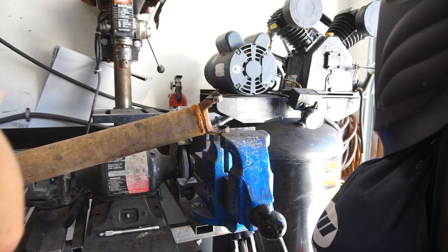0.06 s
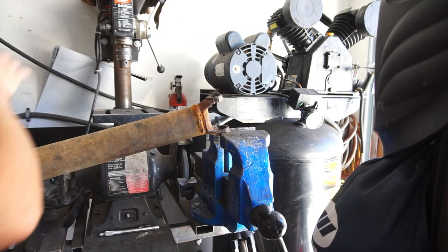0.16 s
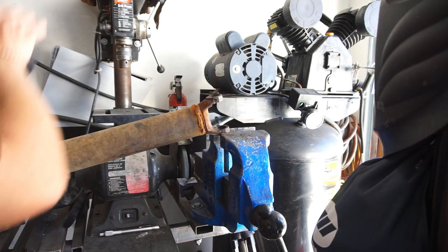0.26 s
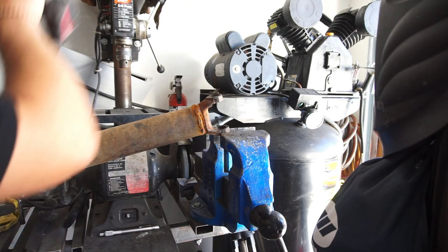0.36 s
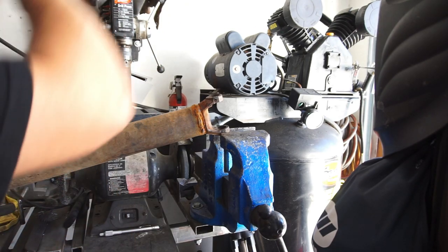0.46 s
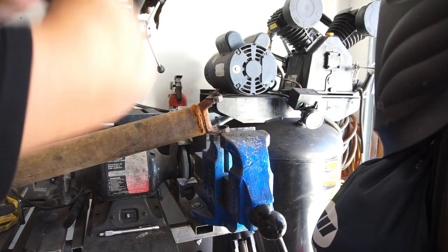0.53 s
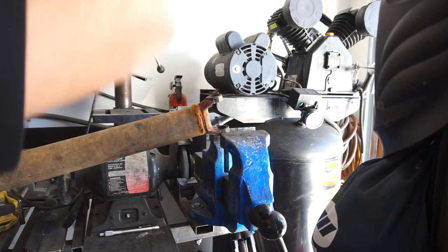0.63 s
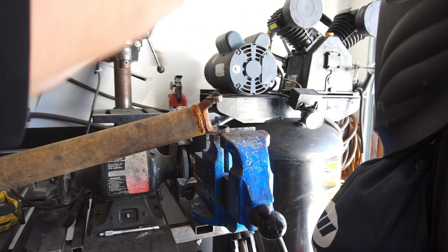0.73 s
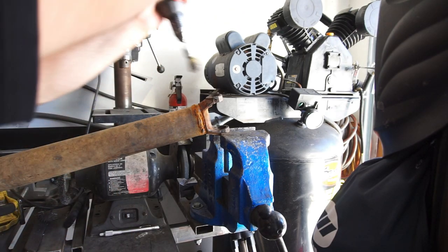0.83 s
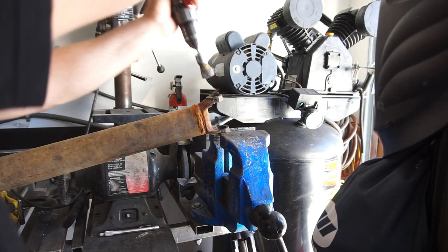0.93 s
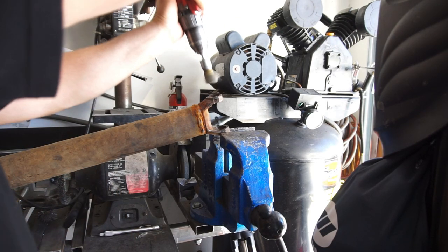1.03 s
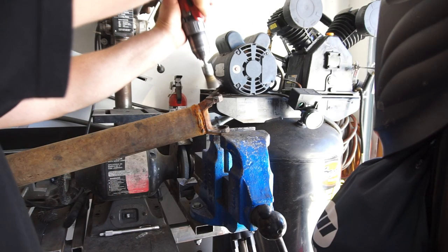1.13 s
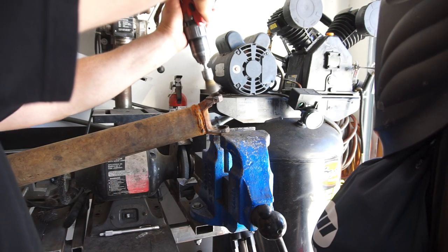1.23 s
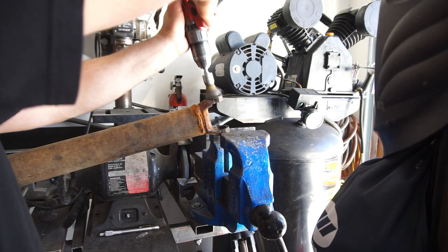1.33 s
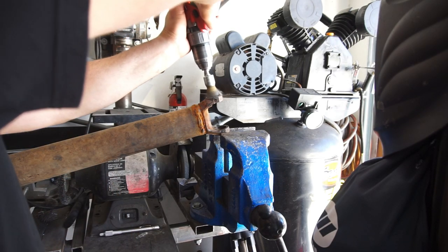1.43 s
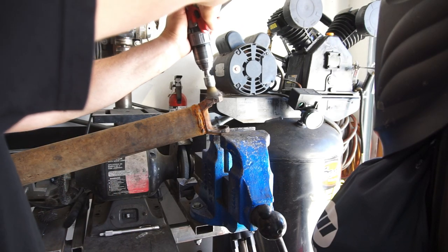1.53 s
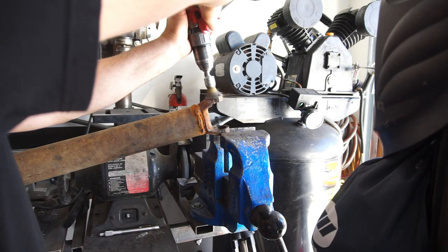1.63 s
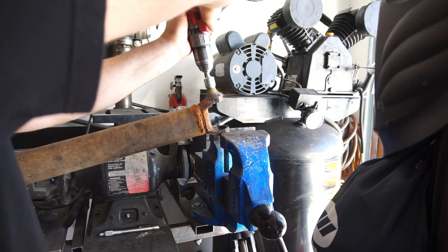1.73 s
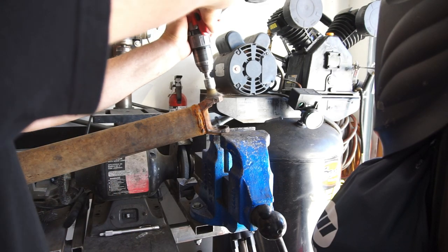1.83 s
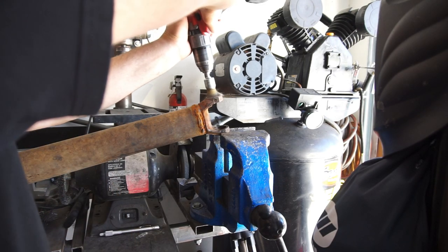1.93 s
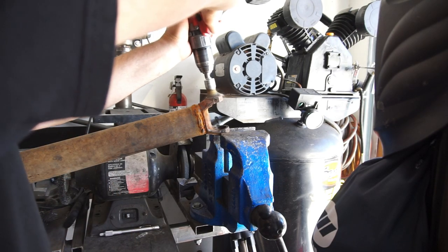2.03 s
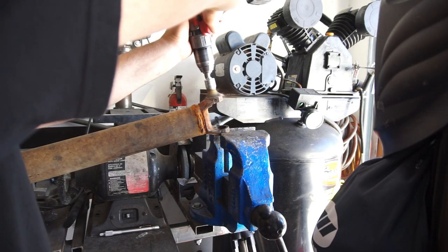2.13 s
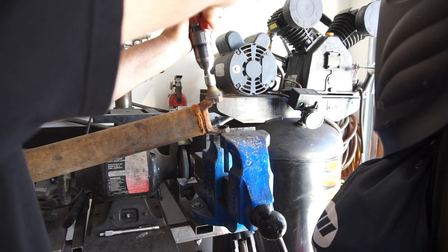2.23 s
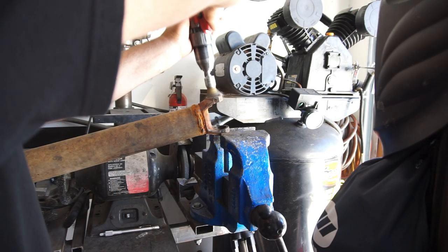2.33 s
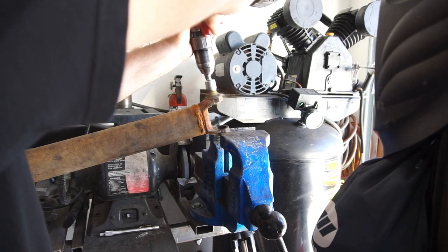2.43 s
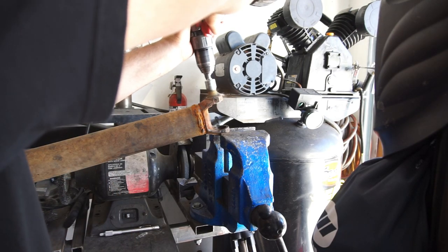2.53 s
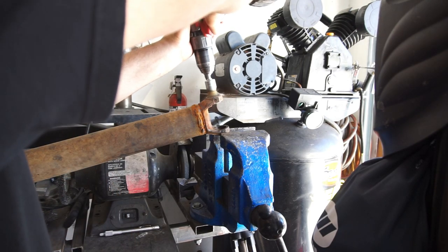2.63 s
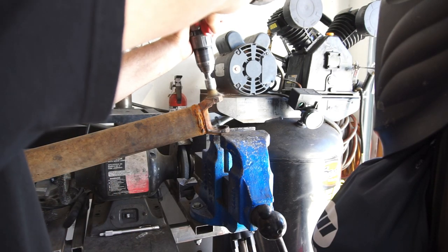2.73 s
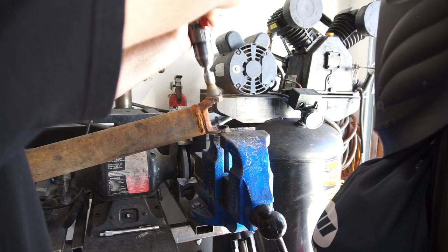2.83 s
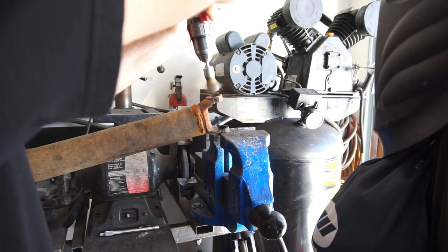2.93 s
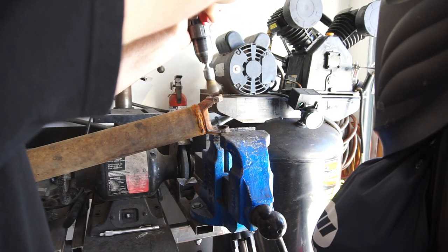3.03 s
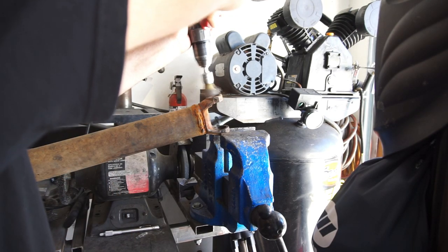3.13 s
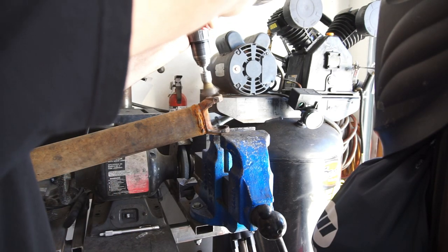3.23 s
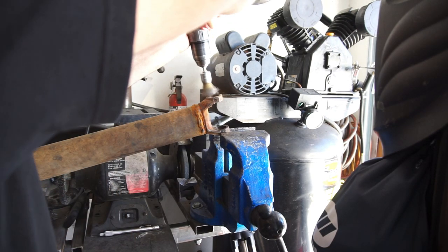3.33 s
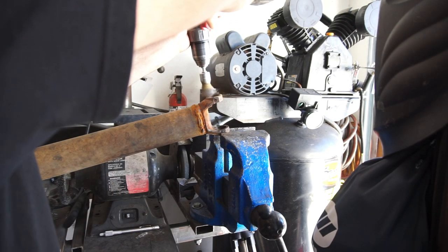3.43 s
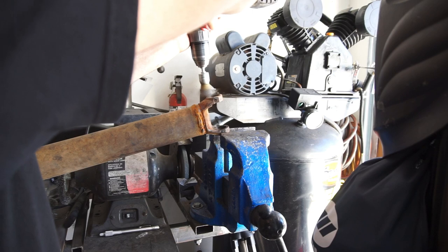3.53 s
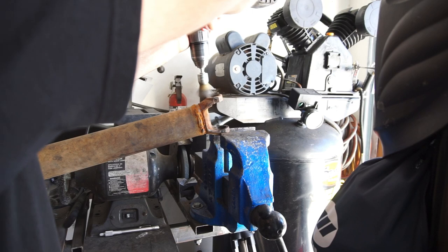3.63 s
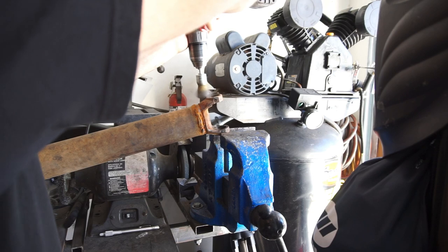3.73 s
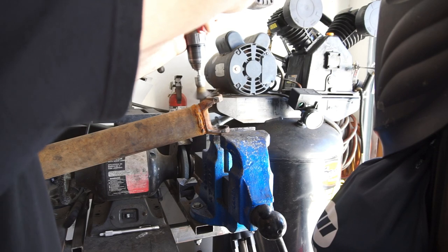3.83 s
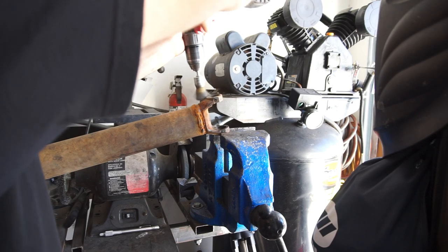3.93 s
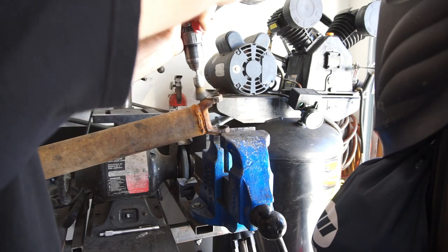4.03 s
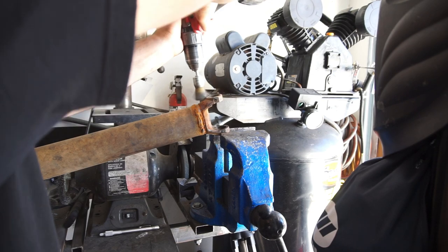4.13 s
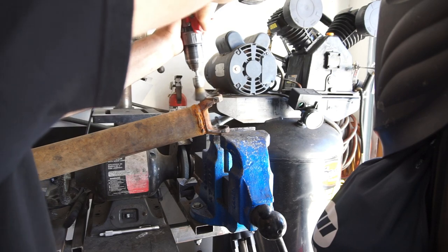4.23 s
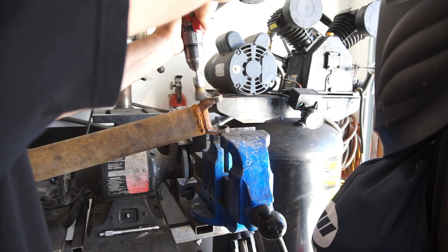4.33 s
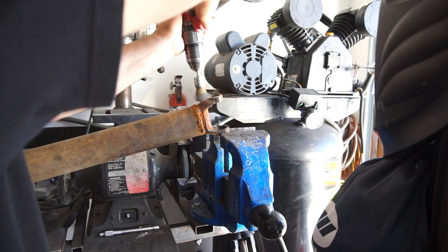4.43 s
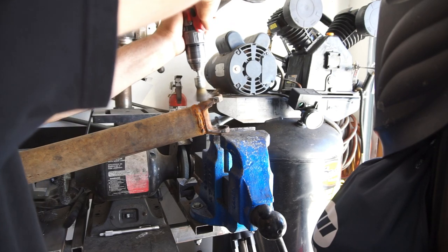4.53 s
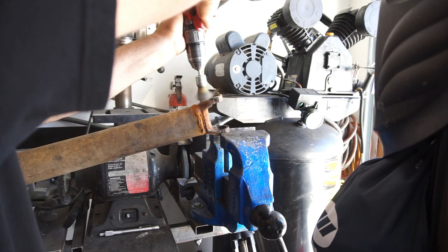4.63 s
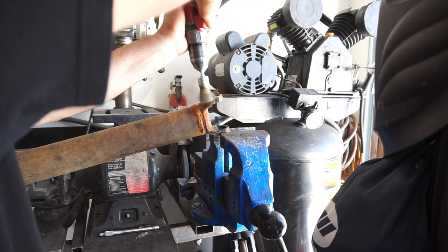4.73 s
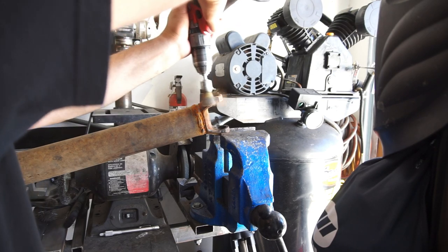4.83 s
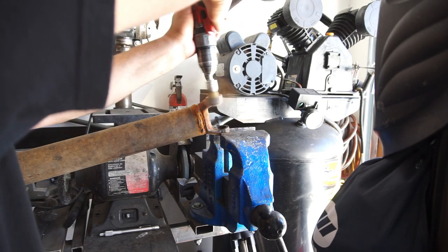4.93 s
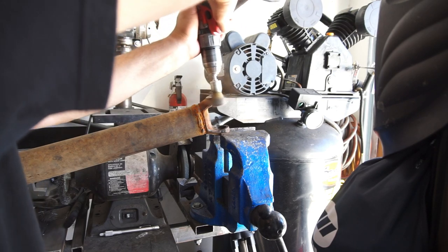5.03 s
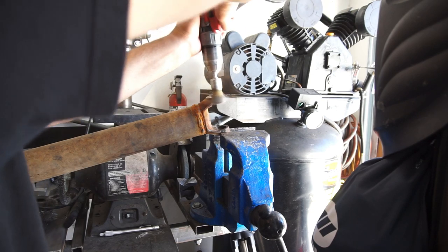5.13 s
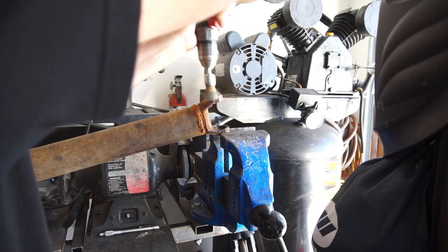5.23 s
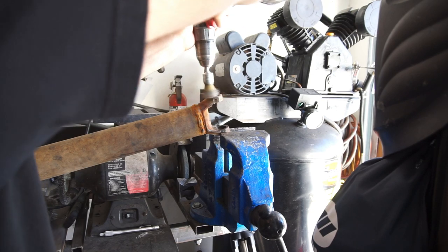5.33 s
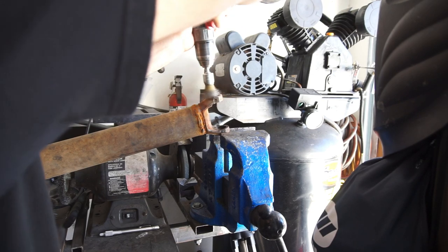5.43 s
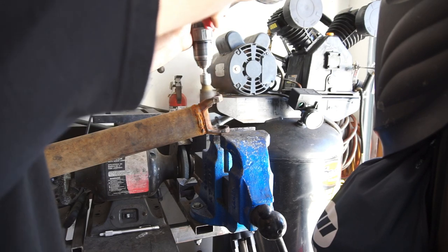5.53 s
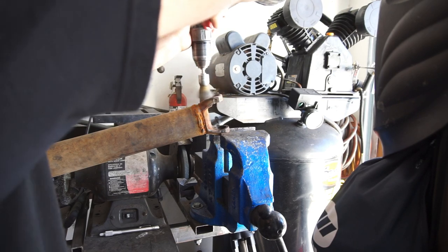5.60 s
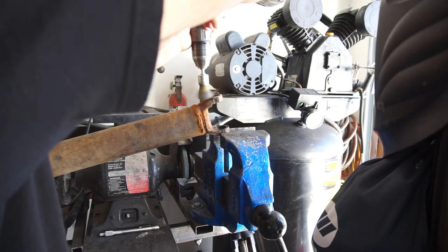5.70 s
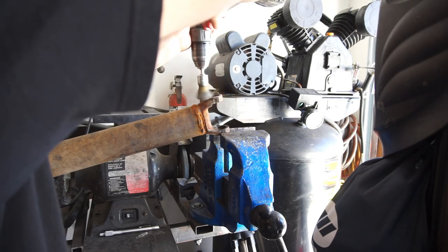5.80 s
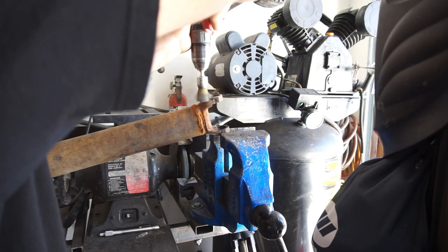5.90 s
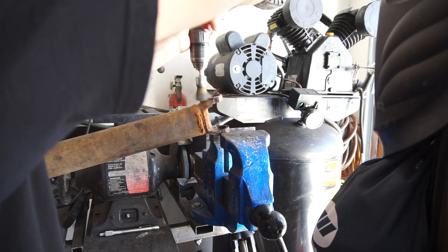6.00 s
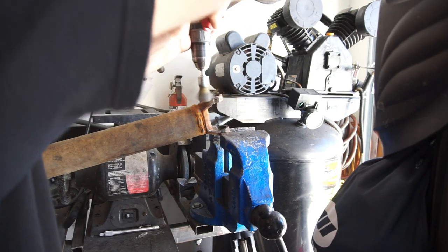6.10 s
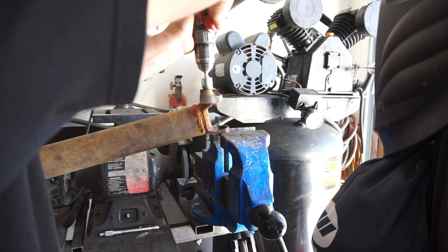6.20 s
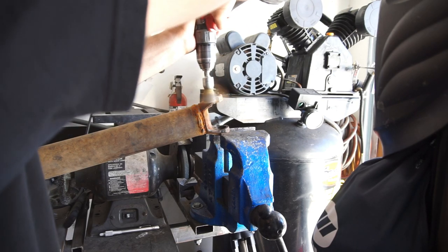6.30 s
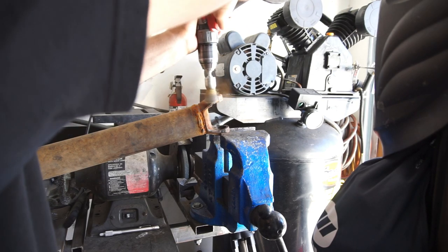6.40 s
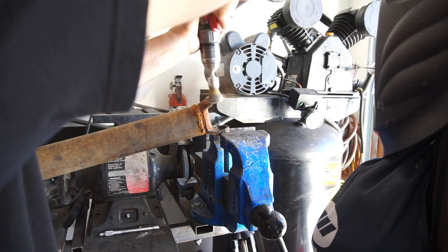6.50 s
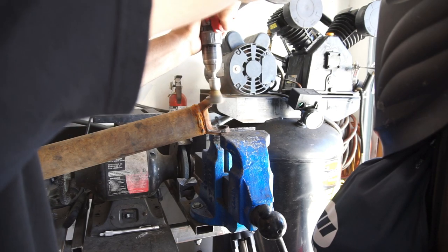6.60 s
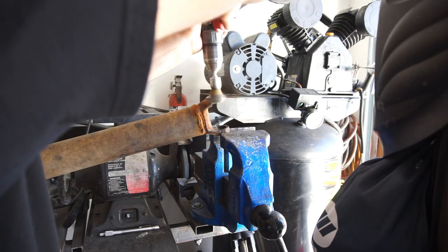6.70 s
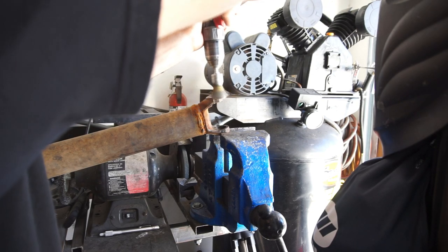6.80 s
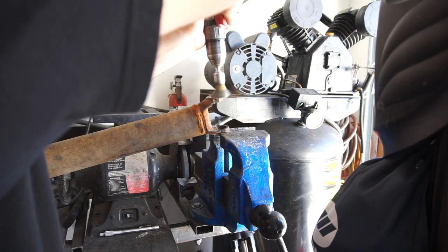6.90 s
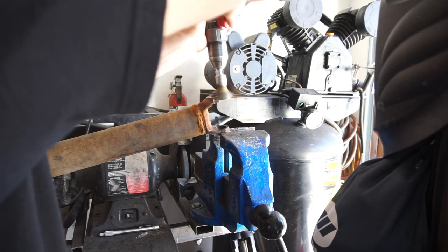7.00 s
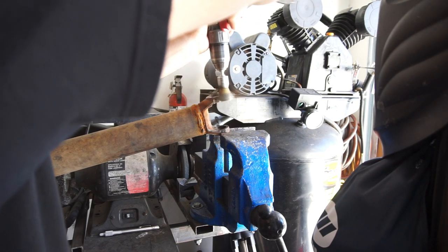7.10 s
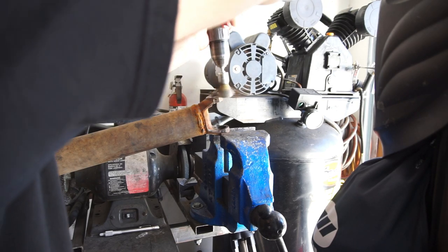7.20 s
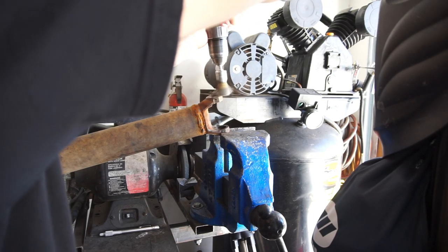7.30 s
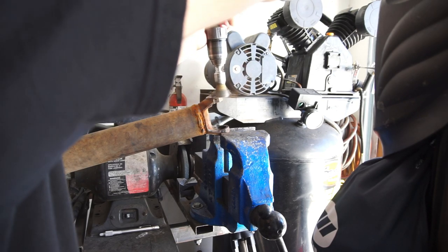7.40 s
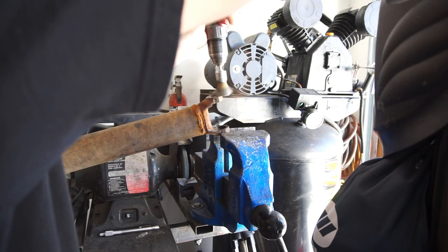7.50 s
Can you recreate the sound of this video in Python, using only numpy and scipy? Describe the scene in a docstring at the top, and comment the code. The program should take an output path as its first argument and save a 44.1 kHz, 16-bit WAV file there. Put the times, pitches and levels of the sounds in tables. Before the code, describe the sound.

In a garage, heard through a small close stereo microphone, the first 0.75 s is quiet handling: a dull double knock at about 0.05 s with metal ringing briefly after it, a lighter tap at 0.1 s, sleeve rustle, cloth swipes near 0.2 and 0.4 s, and a clack at 0.25 s leaning left. A distant engine idles very faintly beneath low room noise. At 0.75 s a thin, very high electronic whine appears and climbs; a sharp click at 0.85 s and a burst of gear rattle follow as the drill leaps to speed. By 1 s it is loud and full. Until 7.5 s a wire brush grinds rusty steel with dense bright hiss and a gritty midrange scrape ringing in the bar, over a nasal motor and gear whine near constant pitch, whose tones sag slightly, flare and fade. It ends still running, with no treble above about 11 kHz.

```python
"""Wire brush on a rusty bar

In a garage, close to a small stereo microphone, a cordless drill is handled while an engine idles far off.
Then it starts up and spins a wire brush against a rusty steel bar, the bar ringing under the scrape.
Motor, gears and engine are sums of tones locked to their rotation; fan, bristles, cloth and room are
shaped noise; knocks and gear rattle are bursts through resonators. A gain control evens the level.
"""
import sys
import numpy as np
from scipy import signal
from scipy.fft import rfft, irfft
from scipy.io import wavfile
from scipy.ndimage import uniform_filter1d

SR = 44100
rng = np.random.default_rng(int(sys.argv[2]) if len(sys.argv) > 2 else 0)


def wrap_up_sound(samples):
    """Save the sound to the file named by the first command line argument, as 16-bit audio."""
    columns = np.atleast_2d(samples).T
    # keep every value between -1 and 1, then stretch to whole-number steps
    tamed = np.clip(columns, -1, 1)
    steps = np.round(tamed * 32767).astype(np.int16)
    wavfile.write(sys.argv[1], SR, steps)


N = 332955
T = np.arange(N) / SR  # time [s]

# How alike the two microphone ports hear a sound: (frequency [Hz], likeness [1 = the same])
PORT_LIKENESS = [(60, 0.96), (120, 0.97), (220, 1), (430, 0.98), (830, 0.82), (1610, 0.8), (3100, 0.57),
                 (5990, 0.41), (11600, 0.66)]
# Broad noise swells as the rotor spins up:
# (time [s], hiss re running level [dB], scrape re running level [dB])
SWELL = [(.77, -38.5, -38), (.82, -12, -6), (.84, -6, -6), (.98, 1.5, 0)]


def amp(db):
    """Amplitude factor of a level in dB."""
    return 10 ** (np.asarray(db) / 20)


def evened(x):
    """Scale a signal to rms 1."""
    return x / np.sqrt(np.mean(x ** 2) + 1e-20)


def read(points, hz):
    """Read a (frequency, value) table on a logarithmic frequency scale."""
    f, value = np.transpose(points)
    return np.interp(np.log(hz + 1), np.log(f + 1), value)


def curves(rows):
    """Draw each column of a time table as a curve over the whole scene."""
    s, *columns = np.transpose(rows)
    return [np.interp(T, s, c) for c in columns]


def during(rows):
    """One while a time table lasts, with 5 ms edges."""
    inside_s = np.minimum(T - rows[0][0], rows[-1][0] - T)
    return np.clip(inside_s * 200, 0, 1)


def drift(top_hz, low_hz=0.3):
    """Slow chance of rms 1: twelve sines between the two rates, the slower ones stronger."""
    t = T[::128]
    rates = np.geomspace(low_hz, top_hz, 12)
    waves = sum(np.sin(2 * np.pi * (f * t + rng.random())) / np.sqrt(f) for f in rates)
    return np.interp(T, t, evened(waves))


def resonate(x, hz, width_hz):
    """Ring a two-pole resonance; the narrower it is, the longer it rings."""
    r = np.exp(-np.pi * width_hz / SR)
    return signal.lfilter([1 - r, 0, r - 1], [1, -2 * r * np.cos(2 * np.pi * hz / SR), r * r], x)


def blotches(white, bins, steps):
    """Smooth white noise over frequency bins and time steps into blotches of rms 1."""
    across = uniform_filter1d(white, max(round(bins), 1), 0)
    return evened(uniform_filter1d(across, max(round(steps), 1), 1))


def noise(spectrum, same, patchy_db, size=512, modes=(), comb_db=0.):
    """Stereo noise from random short-time spectra with brief wide patches and lasting narrow ripples, rms 1."""
    frames, hz = 4 * N // size + 5, np.fft.rfftfreq(size, 1 / SR)
    a, b, c, d, patches, ripples = rng.standard_normal((frames, len(hz), 6)).T
    frames_per_s = 4 * SR / size
    patches = blotches(patches, 650 * size / SR, .05 * frames_per_s)  # 650 Hz wide, 0.05 s long
    # reflections comb the sound as the tool moves: 70 Hz wide, 0.6 s long
    ripples = blotches(ripples, 70 * size / SR, .6 * frames_per_s)
    like = np.clip(read(same, hz), -1, 1)[:, None]
    left = a + 1j * b
    right = like * left + np.sqrt(1 - like ** 2) * (c + 1j * d)
    mode_power = 1 + sum(4 * amp(db) ** 2 / (1 + (2 * (hz - f) / w) ** 2) for f, w, db in modes)
    shape = amp(read(spectrum, hz)[:, None] + patchy_db * patches + comb_db * ripples)
    shape = shape * np.sqrt(mode_power * np.ones(len(hz)))[:, None]
    spectra = np.array([left, right]) * shape
    return evened(signal.istft(spectra, nperseg=size, noverlap=3 * size // 4)[1][:, :N])


def tone(turns, hz, db, blur_hz=0.):
    """A tone with a wandering phase; the ports hear it a little apart in phase, db being their mean's rms."""
    walk = np.cumsum(rng.standard_normal(N)) * np.sqrt(2 * np.pi * blur_hz / SR)
    apart = np.arccos(np.clip(read(PORT_LIKENESS, hz), -1, 1))
    lag = np.clip(apart * drift(5.8), -2, 2)  # radians
    phase = 2 * np.pi * (turns + rng.random()) + walk
    return np.sqrt(2) * amp(db) * np.sin([phase + lag / 2, phase - lag / 2]) / np.cos(lag / 2)


def idling_engine():
    """An engine idles some way off: multiples of its cycle rate, aligned so that they sum to throbs."""
    # (time [s], rate [cycles/s], level change [dB])
    idle = [(0, 6.58, 0), (2.3, 6.58, -2.5), (2.7, 6.4, -5), (2.9, 6.6, 2), (3.4, 6.6, 2), (3.7, 6.45, -4),
            (4.4, 6.35, -5), (5.2, 6.4, -4), (7.1, 6.47, -1), (7.55, 6.4, -2)]
    # Sounding multiples of the cycle: (multiple)
    idle_orders = (15, 16, 17, 23, 24, 25, 29, 31, 32, 33, 34, 35, 45)
    # Levels of those multiples before the level change: (rms [dB])
    idle_levels = [-101, -89, -86.5, -100, -81.5, -100, -86, -94, -72, -85.5, -72.5, -88, -106]
    first_throb_s = 0.0041
    rate, level_db = curves(idle)
    cycles = np.cumsum(rate) / SR - rate[0] * first_throb_s
    ports = np.array([[.02], [-.02]])  # the ports hear it a little apart, in turns
    engine = 0
    for k, db in zip(idle_orders, idle_levels):
        engine += amp(db + 0.52 * drift(2.8)) * np.cos(2 * np.pi * (k * cycles + ports))
    return np.sqrt(2) * amp(level_db) * engine


def room_noise():
    """Low noise of the garage itself, steady in level."""
    # (frequency [Hz], relative density [dB per Hz])
    room_spectrum = [(25, -38), (55, -19), (90, -9), (130, -5.5), (170, -6), (250, -3.5), (350, -6),
                     (500, -11.5), (700, -29.5)]
    return amp(-75) * noise(room_spectrum, PORT_LIKENESS, 2.0, size=4096)


def rustle():
    """Sleeves rustle throughout the handling and a hand swipes over cloth: bright and duller noise."""
    # Sleeves: (time [s], bright rustle rms [dB], duller scuffing rms [dB])
    sleeves = [(0, -65, -65), (.12, -65.5, -62.5), (.21, -62.5, -75), (.3, -60, -69), (.42, -62.5, -70),
               (.62, -63, -77), (.74, -68, -86), (.8, -62, -82)]
    # Swipes: (time [s], bright rustle rms [dB], duller scuffing rms [dB])
    swipes = [(.215, -54, -59.5), (.377, -56, -67)]
    # Bright rustle of cloth: (frequency [Hz], relative density [dB per Hz])
    cloth_spectrum = [(300, -17), (600, -10.5), (2000, -8.5), (3500, -7.5), (5500, -9.5), (8000, -7.5),
                      (10500, 0), (11500, -3.5)]
    # Duller scuffing: (frequency [Hz], relative density [dB per Hz])
    scuff_spectrum = [(350, -36), (600, 8.5), (1100, -3), (2000, 11), (3000, -6), (5000, -4)]
    # How alike the ports hear the cloth: (frequency [Hz], likeness [1 = the same])
    cloth_likeness = [(60, 0.97), (220, -0.28), (830, 0.12), (3100, 0.11), (11600, -0.32)]
    rise_s, t60_s, lean_db = 0.0065, 0.35, 3.  # of a swipe; the hands are nearer the left port
    power = amp(curves(sleeves)) ** 2
    for s, *db in swipes:
        after = np.maximum(T - s, 0)
        rise = np.minimum(after / rise_s, 1)
        power += (rise * amp(np.array(db)[:, None] - 60 * after / t60_s)) ** 2
    bright = np.sqrt(power[0]) * noise(cloth_spectrum, cloth_likeness, 1.8)
    dull = np.sqrt(power[1]) * noise(scuff_spectrum, cloth_likeness, 2.8)
    return (bright + dull) * amp([[lean_db / 2], [-lean_db / 2]])


def ringing_metal():
    """Metal still ringing at the opening: slightly blurred tones that die away."""
    # (frequency [Hz], rms at the opening [dB], t60 [s])
    ringing = [(596, -73, 0.77), (820, -67.5, 0.56), (1620, -67, 0.46)]
    return sum(tone(hz * T, hz, db - 60 * T / t60, 6.6) for hz, db, t60 in ringing)


def knocks():
    """Each knock of the tool rings the housing modes near its centre and the low body, with a noisy tail."""
    # (time [s], peak [dB], centre [Hz], t60 of the tail [s], left minus right [dB], low body re housing [dB])
    blows = [(.051, -38, 2050, 0.17, 2, 3), (0.068, -46, 1960, .14, -3, -10), (.111, -54, 1900, .1, 5, -1),
             (.256, -40.5, 2700, 0.1, 7, -27), (.791, -51, 4200, .05, 2, -20),
             (.852, -21.5, 4000, .05, 0, -18)]
    # Modes of the housing: (frequency [Hz], level [dB])
    housing_modes = [(1200, -6), (1550, -3), (1880, 8), (2300, 4.5), (2750, 1), (3600, -12), (5000, -12),
                     (7500, -20)]
    # Modes of the low body: (frequency [Hz], level [dB])
    body_modes = [(610, -6), (690, 11), (840, 2)]
    out, t = np.zeros((2, N)), np.arange(SR // 4) / SR
    for s, db, hz, t60, pan_db, body_db in blows:
        decay = np.exp(-t / 0.0011) + 0.22 * amp(-60 * t / t60)
        blow = rng.standard_normal((2, len(t))) * decay
        blow[1] = .8 * blow[0] + .6 * blow[1]  # the ports hear much the same blow
        # a blunt blow holds little treble
        blow = signal.sosfilt(signal.butter(2, 1.4 * hz, fs=SR, output="sos"), blow)
        housing = 0
        for f, mode_db in housing_modes:
            off_centre_db = 6 * abs(np.log2(f / hz))  # 6 dB weaker per octave from the centre
            housing += amp(mode_db - off_centre_db) * resonate(blow, f, .1 * f)
        body = sum(amp(mode_db) * resonate(blow, f, 75.0) for f, mode_db in body_modes)
        ring = evened(housing) + amp(body_db) * evened(body)
        pan = np.array([[pan_db / 2], [-pan_db / 2]])
        at = round(s * SR)
        out[:, at:at + len(t)] += amp(db + pan) * ring / abs(ring).max()
    return out


def switching_whine():
    """Switching whine of the speed control: one tone climbs while another holds the first pitch."""
    # (time [s], frequency [Hz], rms [dB], rms of the part that stays at the first pitch [dB])
    whine = [(.745, 9950, -72, -90), (.75, 9950, -47, -90), (.795, 9930, -45, -60), (.81, 10120, -42, -46),
             (.83, 10350, -41, -47), (.85, 10550, -45, -70), (.87, 10700, -70, -90)]
    hz, db, held_db = curves(whine)
    climbing = tone(np.cumsum(hz) / SR, hz[0], db)
    held = tone(hz[0] * T, hz[0], held_db)
    return (climbing + held) * during(whine)


def gear_rattle():
    """Gears rattle while the slack is taken up: random clicks ring the modes of the case."""
    # (time [s], rms [dB])
    rattle = [(0.787, -50), (0.82, -40), (0.858, -29), (0.885, -38), (0.93, -47)]
    # Modes of the case: (frequency [Hz], width [Hz], level [dB])
    case_modes = [(3600, 140, 0), (3330, 180, -11), (4250, 250, -12)]
    clicks = rng.standard_normal((3, N)) * (rng.random((3, N)) < 3000 / SR)  # 3000 a second
    at_ports = clicks[0] + 0.75 * clicks[1:]  # a shared part and one for each port
    ring = evened(sum(amp(db) * resonate(at_ports, f, w) for f, w, db in case_modes))
    return amp(curves(rattle)[0]) * ring * during(rattle)


def brush_noise(turns):
    """Fan and bristle hiss pulses once a rotor turn and bursts as wires snag; the scrape rings in the bar."""
    # Hiss: (frequency [Hz], relative density [dB per Hz])
    hiss_spectrum = [(2350, -68), (4000, -10), (4430, -7.5), (4700, -7), (4810, -7.5), (5300, -7.5),
                     (5460, -6), (5950, -2), (6940, -0.5), (10400, 0.5), (11100, -8), (14400, -50),
                     (22000, -120)]
    # Resonant peaks in the hiss: (frequency [Hz], width [Hz], level before a 6 dB lift [dB])
    hiss_peaks = [(6690, 200, -4), (7190, 200, -4.5), (7850, 460, -6), (8250, 200, -16), (8540, 160, -14),
                  (9180, 200, -16), (11090, 780, -7.5)]
    # Scrape: (frequency [Hz], relative density [dB per Hz])
    scrape_spectrum = [(250, -65), (330, -17), (500, -18.5), (650, -4.5), (900, -6), (1500, -3.5),
                       (2300, 0.5), (3200, -2), (4500, -2), (5500, -1.5), (7000, -16.5)]
    # Modes of the bar: (frequency [Hz], width [Hz], level before a 6 dB lift [dB])
    bar_modes = [(868, 24, -5.5), (1222, 55, -4.5), (1712, 22, -1), (1713, 58, -5.5), (1998, 38, -2),
                 (3000, 110, -6)]
    # Running level of the scrape in the bar: (time [s], rms [dB])
    pressure = [(1, -38.5), (2.5, -39), (3, -36.5), (4.2, -38.5), (5, -36.8), (5.9, -37), (7.55, -36)]
    comb_db = 2.4  # depth of the reflection ripples
    hiss_up_db, scrape_up_db = curves(SWELL)
    flicker = evened(uniform_filter1d(rng.standard_normal(N), size=700))  # uneven bristle contact
    pulse = 1 + .11 * np.cos(2 * np.pi * turns)
    snags = rng.random(N) < 900 / SR  # 900 a second
    ticks = amp(4.0 * np.minimum(rng.exponential(1, N), 4)) * snags
    burst = np.exp(-np.arange(150) / 35.)  # a wire snags: brief burst
    bite = 1 + 0.038 * evened(np.convolve(ticks, burst)[:N])
    hiss = noise(hiss_spectrum, PORT_LIKENESS, 0.85, size=2048, modes=hiss_peaks, comb_db=comb_db)
    hiss = amp(-31 + hiss_up_db + .5 * flicker) * pulse * evened(bite * hiss)
    scrape = noise(scrape_spectrum, PORT_LIKENESS, .8, size=2048, modes=bar_modes, comb_db=comb_db)
    scrape = amp(curves(pressure)[0] + scrape_up_db + 0.53 * flicker) * scrape
    return hiss + scrape


def rumble():
    """Low noise under the running tool, wandering in level."""
    # (frequency [Hz], relative density [dB per Hz])
    rumble_spectrum = [(15, -51), (25, -21), (48, -10), (86, 1), (113, -1), (151, -10), (170, -5),
                       (220, -31), (370, -120)]
    # (time [s], rms before the wander [dB])
    shake = [(.77, -75), (.86, -88), (1.5, -93), (2.5, -100), (2.85, -82), (4.2, -83), (5.4, -78),
             (7.55, -79)]
    level_db = curves(shake)[0] + 2.5 * drift(6.)
    return amp(level_db) * noise(rumble_spectrum, PORT_LIKENESS, 1.1, size=4096)


def motor():
    """Rotor and gear tones at multiples of the rotor speed; returns the tones and the rotor angle in turns."""
    # Spin-up: (time [s], speed [turns/s], tones re running level [dB], four-pole tone re running level [dB])
    spin_up = [(.8, 70, -45, -35), (.85, 185, -24, -9), (.88, 280, -12, 0), (.9, 308, -11, 2),
               (.95, 338, -6, -2), (1.0, 347, 0, 0)]
    # The load of the brush sags the rotor: (time [s], speed [turns/s])
    loaded_speed = [(1.05, 350.6), (1.2, 351.6), (1.55, 351.4), (1.93, 347.1), (2.17, 351.6), (2.32, 346.8),
                    (2.55, 347.5), (2.85, 354.9), (3.05, 353), (3.6, 351.6), (3.8, 348.9), (4.43, 347.9),
                    (4.68, 349.4), (4.92, 353.2), (5.1, 351.4), (5.55, 351.2), (5.8, 349), (6.3, 349.2),
                    (6.9, 351.8), (7.17, 353.7), (7.32, 352.2), (7.55, 352)]
    # Rotor orders of the pole tones: (multiple)
    pole_orders = (4, 8)
    # They flare and drop out as grip and angle change: (time [s], rms of order 4 [dB], of order 8 [dB])
    pole_levels = [(1.02, -49, -52), (1.15, -45.5, -48), (1.4, -46, -50), (1.66, -49.5, -52),
                   (1.74, -66, -52), (1.88, -52, -54), (2.08, -52, -52), (2.14, -45, -46),
                   (2.3, -53.5, -54), (2.63, -51.5, -51), (2.69, -43.5, -45), (3.2, -47, -45),
                   (3.68, -49, -52), (3.75, -69, -49), (4.28, -69, -48), (4.37, -52, -61), (4.5, -53, -54),
                   (4.6, -56, -64), (4.76, -50, -57), (4.83, -42.5, -43), (5.15, -45.5, -43),
                   (5.3, -50.5, -49), (5.55, -47.5, -50), (5.78, -61, -52), (5.95, -49.5, -54),
                   (6.15, -54, -53), (6.28, -68, -66), (6.38, -47.5, -53), (6.64, -56, -56),
                   (6.7, -50, -46), (6.95, -51, -47), (7.2, -44, -42), (7.32, -56, -55), (7.43, -51, -43),
                   (7.55, -53, -44)]
    # Rotor orders of the slower tones, the last a high gear tone: (multiple)
    slow_orders = (2, 10, 13, 16, 29.73)
    # They change more slowly: (time [s], rms of orders 2, 10, 13, 16 and of the high gear tone [dB])
    slow_levels = [(1.02, -57, -69, -46, -45, -62), (1.4, -57.5, -64, -46.5, -45, -62),
                   (1.9, -55.5, -51.5, -48, -48, -52), (2.6, -55.5, -48, -47.5, -47.5, -55),
                   (2.95, -48.5, -49, -49, -45, -60), (3.25, -54.5, -48, -46, -52, -44),
                   (3.6, -59, -51, -50.5, -46, -41), (4.0, -55, -60, -46, -42.5, -39),
                   (4.4, -64, -54, -56, -49, -48), (4.55, -66, -65, -47.5, -49, -44),
                   (4.9, -51, -51, -45.5, -51, -62), (5.5, -57, -47, -45, -44.5, -46),
                   (6.1, -67, -56, -44, -45, -48), (6.45, -56, -55, -53, -48, -57),
                   (6.75, -52.5, -49, -44, -45, -55), (7.2, -49.5, -50, -47, -49, -58),
                   (7.55, -54, -52, -50, -51, -55)]
    # Shaft and gear mesh: (multiple, rms at first [dB], rms at last [dB], slow wander [dB])
    steady_tones = [(1, -60, -57.6, .4), (10.21, -50, -50.5, 2.2)]
    # Weaker rotor and gear tones: (multiple)
    weak_multiples = (2.52, 3.29, 4.5, 4.9, 5, 7, 7.5, 9.21, 11.21, 12, 17.6, 19.5, 20.5, 21.48, 26.02,
                      28.04)
    # Those weak tones drift by chance: (rms [dB], twice the blur [Hz])
    weak_levels = [(-68, 10), (-68, 10), (-62, 10), (-64, 10), (-66, 6), (-57, 3), (-65, 10), (-67, 8),
                   (-60, 5), (-54, 3), (-62, 10), (-55, 15), (-54, 15), (-59, 20), (-58, 20), (-60, 15)]

    speed = curves([row[:2] for row in spin_up] + list(loaded_speed))[0]
    turns = np.cumsum(speed) / SR
    _, up_db, pole_up_db = curves(spin_up)
    levels = [*zip(pole_orders, curves(pole_levels)), *zip(slow_orders, curves(slow_levels))]
    for k, first_db, last_db, wander_db in steady_tones:
        levels.append((k, np.linspace(first_db, last_db, N) + wander_db * drift(3.)))
    out = 0
    for k, db in levels:
        flutter_db = min(1 + .1 * k, 2.) * drift(60, low_hz=3)  # high orders flicker more
        rise_db = pole_up_db if k == 4 else up_db
        out += tone(k * turns, k * speed[-1], db + rise_db + flutter_db, .05 * k)
    for k, (db, blur) in zip(weak_multiples, weak_levels):
        wander_db = 2.8 * drift(30, low_hz=.5)
        out += tone(k * turns, k * speed[-1], db + 2 * up_db + wander_db, blur / 2)
    return out * (T > spin_up[0][0]), turns


def scene():
    """Handling and the garage first, then the drill starts and the brush bites."""
    tones, turns = motor()
    before = idling_engine() + room_noise() + rustle() + ringing_metal() + knocks()
    starting = switching_whine() + gear_rattle()
    running = np.clip((T - SWELL[0][0]) * 100, 0, 1)  # 10 ms fade-in
    return before + starting + (brush_noise(turns) + rumble()) * running + tones


def record(dry):
    """Gain control lifts quiet moments and falls as the tool gets loud; port balance; band limit."""
    # Balance of the microphone ports: (frequency [Hz], left minus right [dB])
    port_lean = [(60, 0.0), (120, -0.5), (220, -0.5), (430, -0.5), (830, 0), (1610, 0.0), (3100, -1),
                 (5990, 2.5), (11600, 0.5)]
    power_db = 10 * np.log10(abs(uniform_filter1d((dry ** 2).mean(0), size=3000)) + 1e-12)
    fall = T * 2.0  # the held level falls 2 dB a second
    held_db = np.maximum.accumulate(power_db + fall) - fall
    lift_db = np.clip(-.4 * (held_db + 28), -3, 8.0)
    lifted = dry * amp(uniform_filter1d(lift_db, size=1500))
    # small microphones lose the bass
    lifted = signal.sosfilt(signal.butter(2, 90., "high", fs=SR, output="sos"), lifted)
    lean = amp(read(port_lean, np.fft.rfftfreq(N, 1 / SR)) / 2)
    balanced = irfft(rfft(lifted) * [lean, 1 / lean], N)
    low_pass = signal.firwin(1535, 11040, window=("kaiser", 9), fs=SR)  # steep treble edge at 11040 Hz
    return signal.oaconvolve(balanced, low_pass[None], "same")


dry = scene()
out = record(dry)
wrap_up_sound(out)
```